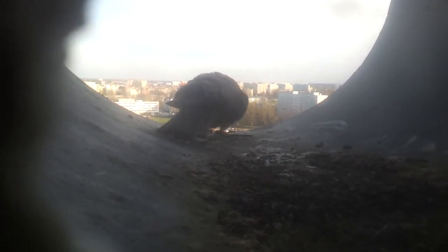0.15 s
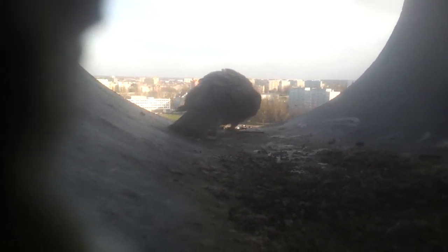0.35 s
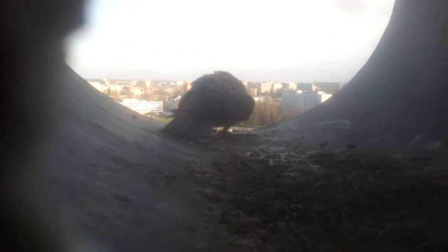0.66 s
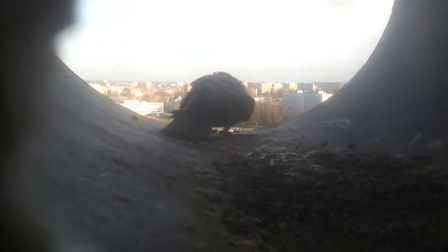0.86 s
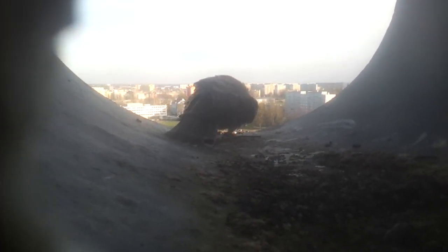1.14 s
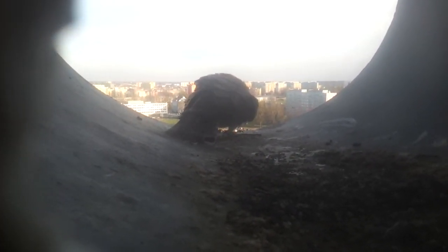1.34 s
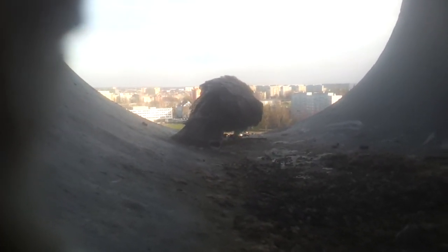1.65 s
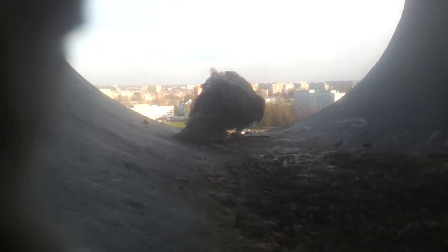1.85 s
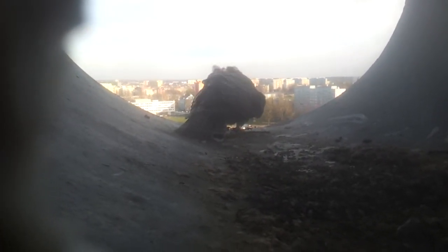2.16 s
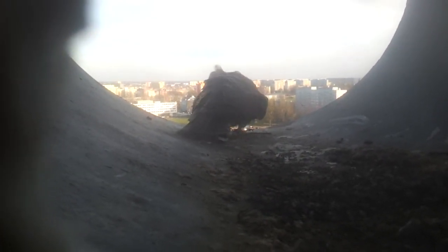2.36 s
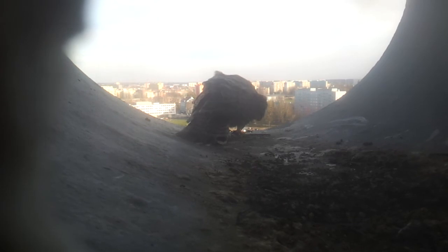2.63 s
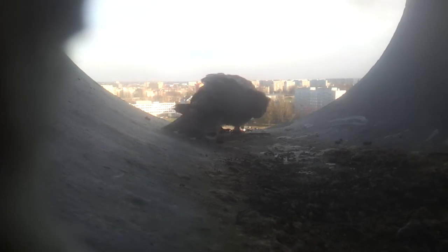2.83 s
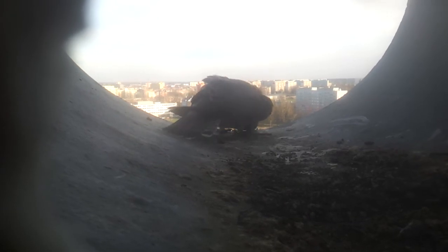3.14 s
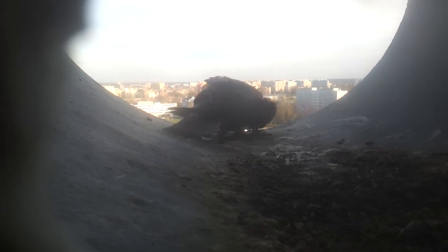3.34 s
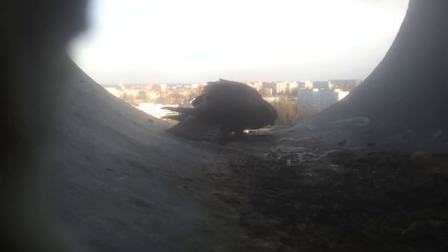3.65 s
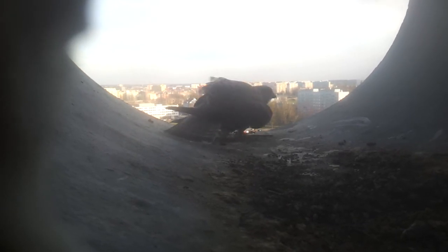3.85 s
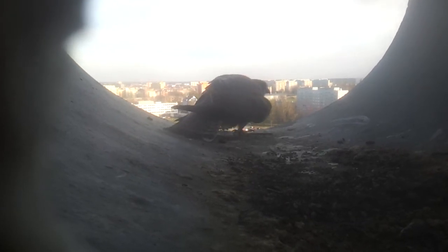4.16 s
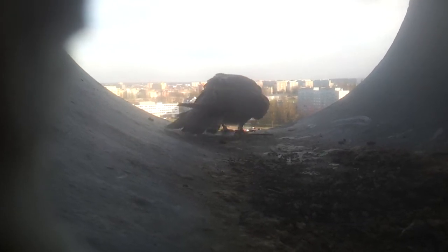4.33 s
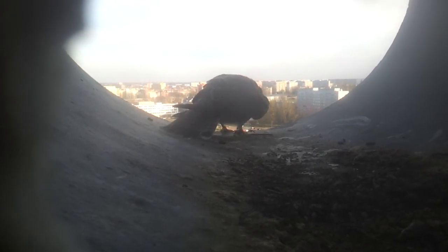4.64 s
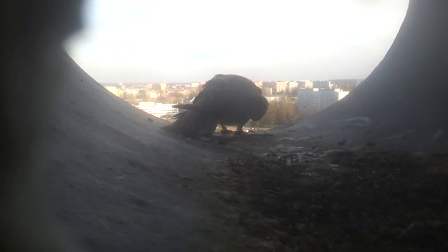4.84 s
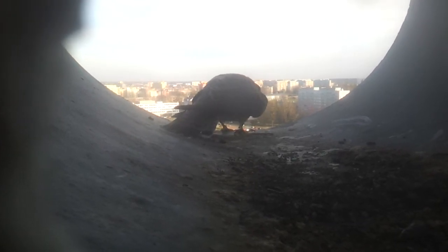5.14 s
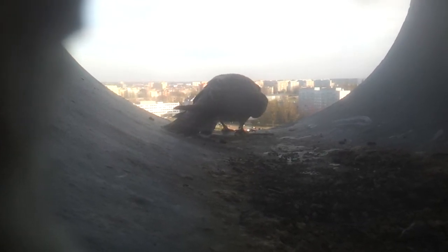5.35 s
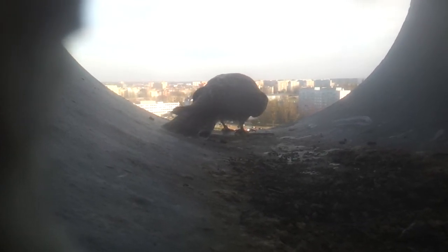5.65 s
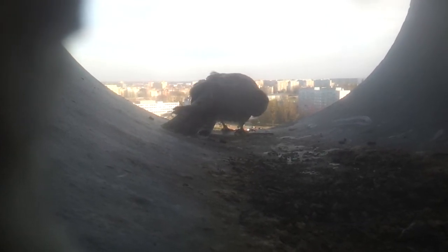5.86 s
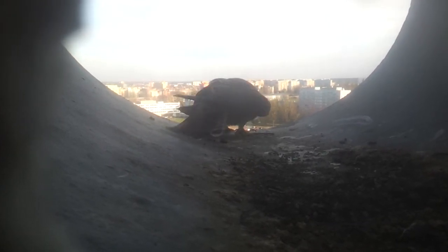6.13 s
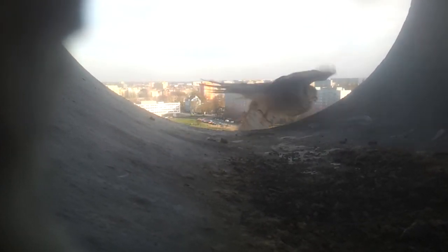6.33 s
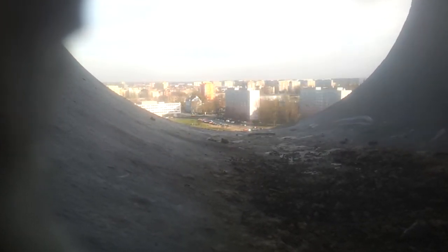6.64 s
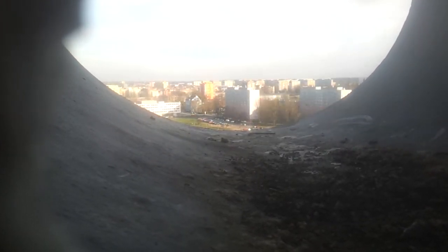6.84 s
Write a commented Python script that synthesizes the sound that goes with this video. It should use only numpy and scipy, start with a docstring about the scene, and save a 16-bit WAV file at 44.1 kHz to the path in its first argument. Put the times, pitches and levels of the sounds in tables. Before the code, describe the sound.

A kestrel gives two runs of shrill trills that ring in a concrete duct, over a steady low rumble of distant traffic.

```python
"""Two runs of shrill kestrel trills ring out at the mouth of a concrete duct, high above a town.
Each trill is a string of arched syllables, about 18 a second, one push of air apiece; pitch and level
climb with effort. The first run cracks into a thin falling whistle. The duct rings after the calls
and booms with distant traffic, and a bird's claws tick twice on the concrete."""
import sys
import numpy as np
from scipy import signal
from scipy.fft import rfft, irfft, next_fast_len
from scipy.io import wavfile
from scipy.ndimage import map_coordinates

SR = 44100
rng = np.random.default_rng(int(sys.argv[2]) if len(sys.argv) > 2 else 0)


def store_pcm(level_fs):
    """Save levels as 16-bit WAV."""
    pcm = np.round(np.clip(level_fs, -1, 1) * 32767).astype(np.int16)
    wavfile.write(sys.argv[1], SR, np.atleast_2d(pcm).T)


N = 308259

# Fader ride of the traffic. Each row: time in seconds, rumble level in dB, tyre roar level in dB.
TRAFFIC_RIDE = [(0, -37.5, -47), (0.8, -36.5, -46.5), (2, -37.5, -46), (3.2, -40.5, -47), (4.2, -39, -47.5),
                (5, -38, -48), (6, -37.5, -49), (6.99, -37.5, -49.5)]
# EQ curves of the three noise beds. Each row: frequency in Hz, gain in dB.
RUMBLE_EQ = [(15, -34), (26, -19), (42, -12), (62, -4.5), (80, -10), (100, -4), (125, -10.5), (165, -12.5),
             (205, -11), (260, -20), (400, -31.5), (900, -92)]
TYRE_EQ = [(120, -22), (290, 3.5), (420, 0), (520, -0.5), (720, -0.5), (950, 4), (1250, 0), (1700, -5),
           (2300, -10.5), (3500, -18.5), (7000, -32.5)]
HISS_EQ = [(800, 2.5), (2500, 0.5), (5000, 4.5), (9000, 2.5), (14500, -1.5)]
# The duct's low, booming resonances. Each row: centre in Hz, width in Hz, lift in dB.
BOOM_MODES = [(53.8, 2.6, 14), (77.3, 3.3, 9), (110.2, 3.2, 5.5), (189.8, 7.9, 4), (356.2, 5.7, 10),
              (458.4, 15, 6.5), (594, 7.8, 8.5)]
# Stereo width of the beds. Each row: frequency in Hz, left-right correlation (1 is mono).
BED_CORRELATION = [(30, 0.96), (120, 0.97), (300, 0.87), (600, 0.65), (1200, 0), (2500, 0), (12000, 0)]
# Stereo balance of the beds. Each row: frequency in Hz, left minus right in dB.
BED_PAN = [(30, 9), (80, 4.5), (170, 2.5), (350, 2.5), (700, -0.5), (1400, -1.5), (4000, 0), (12000, 0)]

# Narrow cross resonances that the calls sweep through. Each row: centre in Hz, width in Hz, lift in dB.
DUCT_CROSS_MODES = [(1564, 15, 6.5), (1886, 18, -1.5), (3010, 70, 6)]
# Standing waves pull each pitch to one side.
# Each row: frequency in Hz, left minus right in dB, left phase lead in radians.
STANDING_WAVES = [(1520, -22, 0), (1720, 1, 5.5), (1495, 6, -1.37), (1940, -2.5, 2.48), (3090, -2.5, 6.5),
                  (3255, -0.5, 1), (3388, -9.5, 4), (3463, -3.5, -0.54), (4950, -4.5, 1.25), (4980, -5, 3),
                  (5660, 7.5, -3), (6360, 1, 2.5), (6550, 4, 3), (7300, 2, 0.6), (9350, -16, 1.5)]
# Decay of the duct's ring. Each row: frequency in Hz, seconds to fall by 60 dB.
RING_DECAY = [(1000, 0.63), (3500, 0.63), (5500, 0.53), (7200, 0.45), (12000, 0.16)]
# EQ on the send to that ring. Each row: frequency in Hz, gain in dB.
RING_EQ = [(1600, 1.5), (2400, 0.5), (3100, -6), (3620, 1.5), (3900, 4), (4800, -1.5), (5400, 5),
           (7100, -0.5), (9000, 12)]

# Claws on concrete. Each row: start in seconds, relative level in dB.
CLAW_TICKS = [(0.2278, -27.5), (3.4044, -40)]
# Their bright tone. Each row: frequency in Hz, gain in dB.
CLAW_EQ = [(500, -25), (2000, -10), (4000, 2), (8000, 2), (12000, -14)]

# Throat and open bill, shaping harmonics 3 to 8. Each row: frequency in Hz, gain in dB.
THROAT_EQ = [(4000, 7), (4700, 1), (5100, -0.5), (5500, -2.5), (6000, -7.5), (6500, -3), (7200, -1),
             (8100, -11.5), (9000, -18.5), (10300, -32), (12500, -31), (14500, -73)]
# Single chips, cracks and a yelp. Each row: start in seconds, length in seconds, pitch in Hz, second
# harmonic level in dB, fundamental and upper harmonics in dB against it (before EQ), jitter as a share.
CHIP_CUES = [(0.535, 0.098, 1380, -57, 11.5, -4, 0.01), (0.67, 0.032, 1618, -45, -10, -4, 0.022),
             (0.718, 0.045, 1486, -43, -3, -3, 0.0086), (2.114, 0.027, 1960, -26, -10, -14, 0.014),
             (2.137, 0.0359, 1821, -26.5, -14, -9, 0.015), (2.689, 0.03, 1506, -34, -7, -10.5, 0.029),
             (2.857, 0.033, 1474, -33.5, -21, -16.5, 0.017), (2.872, 0.015, 1820, -41.5, 7.5, -10, 0.016),
             (2.88, 0.025, 1600, -34.5, -8, -9.5, 0.019), (4.262, 0.047, 1436, -45.5, 5.5, -12.5, 0.012),
             (4.312, 0.047, 1484, -39, -3, -10, 0.0091), (6.3, 0.024, 1534, -22.5, -15, -12, 0.0019)]
# Trills. Each row: start, end and syllable period in seconds, first and last pitch in Hz, syllable sag
# as a share of pitch, dip between syllables in dB, final second harmonic level in dB, swell up to it
# in dB, fundamental and upper harmonics in dB against that level (before EQ), jitter as a share.
TRILL_CUES = [(0.787, 0.94, 0.049, 1602, 1646, 0.071, -14.5, -33, 1.9, -5.5, -4, 0.0052),
              (0.949, 1.116, 0.049, 1548, 1737, 0.044, -12, -31.5, 1.5, -10, -7.5, 0.0047),
              (1.313, 1.659, 0.055, 1600, 1785, 0.066, -9.5, -32.5, 13.5, -8, -6.5, 0.006),
              (1.823, 2.119, 0.058, 1714, 1829, 0.064, -14.5, -27.5, 13.4, -12, -8.5, 0.01),
              (2.442, 2.674, 0.06, 1671, 1730, 0.036, -15, -26.5, 12.4, -12.5, -12, 0.0067),
              (4.376, 4.755, 0.0545, 1592, 1794, 0.0302, -10.5, -23, 10.6, -9, -5, 0.0035),
              (4.929, 5.276, 0.056, 1707, 1824, 0.092, -15, -23, 11.1, -12, -7, 0.0049),
              (5.434, 5.720, 0.054, 1716, 1765, 0.04, -13.5, -24.5, 4.3, -13, -10, 0.0033),
              (6.146, 6.299, 0.0525, 1519, 1597, 0.043, -12.5, -34.5, 14.3, -5.5, -4, 0.0047),
              (6.324, 6.513, 0.07, 1591, 1629, 0.014, -4.5, -29.5, 0.37, -10, -9, 0.0029),
              (6.697, 6.985, 0.052, 1618, 1727, 0.039, -10, -43.5, 7.1, -8.5, -5.5, 0.0044)]


def amp(db):
    """Decibels to gain."""
    return 10 ** (np.asarray(db) / 20)


def unit(x):
    """Scale to rms 1."""
    return x / np.sqrt(np.mean(x ** 2) + 1e-20)


def along(points, hz):
    """Read a curve of (Hz, value) points on a log frequency axis."""
    freqs, values = np.transpose(points)
    return np.interp(np.log(hz + 1), np.log(freqs + 1), values)


def lift(resonances, hz):
    """Gain in dB of a set of resonant peaks."""
    return sum(db / (1 + (2 * (hz - centre) / width) ** 2) for centre, width, db in resonances)


def wobble(rate):
    """Smooth random modulation with `rate` knots a second."""
    knots = rng.standard_normal(N // 4)
    at = np.arange(N) * rate / SR
    return map_coordinates(knots[:int(at[-1]) + 4], [at])


def filtered(x, response):
    """Filter x by a complex gain given as a function of Hz."""
    size = next_fast_len(N + SR // 2)
    return irfft(rfft(x, size) * response(np.fft.rfftfreq(size, 1 / SR)), size)[..., :N]


def pan(db):
    """Constant-power stereo gains for a left-minus-right level."""
    pair = np.array([amp(db / 2), amp(-db / 2)])
    return pair / np.sqrt(np.mean(pair ** 2, axis=0))


def noise_bed(eq):
    """Noise booming in the duct: nearly mono in the lows, wide in the highs, mid signal at rms 1."""
    def colour(hz):
        width = np.arccos(np.clip(along(BED_CORRELATION, hz), -1, 1)) / 2
        return amp(along(eq, hz) + lift(BOOM_MODES, hz)) * [np.cos(width), np.sin(width)]
    mid, side = filtered(rng.standard_normal((2, N)), colour)
    pair = filtered(np.array([mid + side, mid - side]), lambda hz: pan(along(BED_PAN, hz)))
    return pair / np.std(pair.mean(axis=0))


def town(drone_hz=33, drone_db=-50, hiss_db=-58):
    """Distant traffic rumbles and its tyres roar, over a deep steady drone and a faint hiss."""
    t = np.arange(N) / SR
    times, rumble_db, tyre_db = np.transpose(TRAFFIC_RIDE)
    drone = unit(np.sin(2 * np.pi * drone_hz * t + 0.078 * wobble(1.85))) * pan(2.6)[:, None]
    rumble = amp(np.interp(t, times, rumble_db)) * noise_bed(RUMBLE_EQ)
    tyres = amp(np.interp(t, times, tyre_db)) * noise_bed(TYRE_EQ)
    return rumble + tyres + amp(drone_db) * drone + amp(hiss_db) * noise_bed(HISS_EQ)


def reverb(x, t60_points):
    """Diffuse stereo reflections: a noise tail whose decay time is set by frequency."""
    hz, t, spectrum = signal.stft(rng.standard_normal((2, SR)), SR, nperseg=256)
    decay = amp(-60 * t / along(t60_points, hz)[:, None])
    tail = signal.istft(spectrum * decay, SR, nperseg=256)[1]
    return signal.fftconvolve(x[None], tail / np.linalg.norm(tail[0]), axes=1)[:, :N]


def duct(x, left_lag_s=0.00033, direct_db=-3.5, walls_db=-6, walls_t60=0.1, ring_db=-12):
    """The duct colours a sound, which arrives on the right first; close walls and a long ring follow."""
    mode_hz, pan_db, lead = np.transpose(STANDING_WAVES)

    def phase_split(hz):
        angle = np.interp(hz, mode_hz, lead) - 2 * np.pi * hz * left_lag_s
        return np.exp(.5j * angle * np.array([[1], [-1]]))
    coloured = filtered(x, lambda hz: amp(lift(DUCT_CROSS_MODES, hz)))
    direct = amp(direct_db) * filtered(coloured, phase_split)
    walls = amp(walls_db) * reverb(coloured, [(1000, walls_t60)])
    near = filtered(direct + walls, lambda hz: pan(np.interp(hz, mode_hz, pan_db)))
    ring_send = filtered(coloured, lambda hz: amp(ring_db + along(RING_EQ, hz)))
    return near + reverb(ring_send, RING_DECAY)


def claws(t60=0.011, trim_db=-3):
    """Claws strike concrete: tiny, bright bursts of noise."""
    ticks, t = np.zeros(N), np.arange(SR // 20) / SR
    for start, db in CLAW_TICKS:
        envelope = amp(db + trim_db - 60 * t / t60)
        ticks[round(start * SR):][:len(t)] += envelope * rng.standard_normal(len(t))
    return filtered(ticks, lambda hz: amp(along(CLAW_EQ, hz)))


def whistle(start_s=2.7, length_s=0.16, ramp_s=0.0039, first_hz=2424, last_hz=2134, jitter=0.021,
            level_db=-39, fade_db=13.5, octave_db=-17):
    """The voice cracks into a thin, unsteady tone that slides down and fades."""
    t = np.arange(N) / SR - start_s
    progress = np.clip(t / length_s, 0, 1)
    hz = first_hz + (last_hz - first_hz) * progress
    phase = 2 * np.pi * np.cumsum(hz * (1 + jitter * wobble(500))) / SR
    tone = np.sqrt(2) * (np.sin(phase) + amp(octave_db) * np.sin(2 * phase))
    gate = np.clip(np.minimum(t, length_s - t) / ramp_s, 0, 1)
    return gate * amp(level_db - fade_db * progress) * tone


def syllables(chip_sag=0.024, chip_dip_db=-8.5, early_s=0.011, pitch_ease=1.636, level_ease=2.3):
    """All syllables in time order. Growing effort lifts and steadies a trill, fast at first."""
    rows = [(start, length, hz, chip_sag, chip_dip_db, db, db + root_db, db + upper_db, jitter)
            for start, length, hz, db, root_db, upper_db, jitter in CHIP_CUES]
    for (start, end, period, first_hz, last_hz, sag, dip_db,
         final_db, swell_db, root_db, upper_db, jitter) in TRILL_CUES:
        count = round((end - start) / period)
        edges = np.r_[start - early_s, start + period * np.arange(1, count), end]
        # slack runs from 1, the softest push, to 0 at full effort
        for onset, length, slack in zip(edges, np.diff(edges), np.linspace(1, 0, count)):
            hz = last_hz - (last_hz - first_hz) * slack ** pitch_ease
            fall = sag * np.exp(0.29 * rng.standard_normal())
            db = final_db + 0.77 * rng.standard_normal()
            held_db = swell_db * slack ** level_ease
            # the second harmonic takes the whole swell, the fundamental and the upper ones a share
            levels = db - held_db, db + root_db - 0.38 * held_db, db + upper_db - 0.87 * held_db
            gap_db = dip_db * (1 - 0.19 * (1 - slack))  # effort partly fills the dips
            rows.append((onset, length, hz, fall, gap_db, *levels, jitter * (1 + 1.39 * slack)))
    return sorted(rows)


def kestrel(attack_s=0.0089, overlap_s=0.007, rasp=0.68, fuzz=0.058,
            hold=0.514, bottom=0.935, glide=0.235, opening_glide=0.374,  # shares of a syllable
            overshoot=0.019, opening_drop=0.1687, closing_drop=0.052,  # shares of its pitch
            flutter_db=1.7, dull_db=-6, closing_db=-9):
    """Trills and chips: each push of air lifts pitch and level together; both sag as it runs out."""
    body, edge = np.zeros((2, N + SR))
    tremor = wobble(260) + rasp * wobble(1300)
    notes = syllables()
    starts, lengths, pitches, falls = np.transpose(notes)[:4]
    paused = starts[1:] - starts[:-1] - lengths[:-1] > .05
    opens, closes = np.r_[True, paused], np.r_[paused, True]
    harmonics = np.arange(3, 9)[:, None]
    # turbulence frays each upper harmonic separately
    fray = 1 + fuzz * np.array([wobble(520) + 1j * wobble(570) for _ in harmonics])
    # after a pause the voice scoops up from below; otherwise it picks up from the last sag
    from_hz = np.where(opens, pitches * (1 - opening_drop), np.roll(pitches * (1 - falls), 1))
    for i, (start, length, pitch_hz, fall, dip_db, second_db, root_db, upper_db,
            jitter) in enumerate(notes):
        t = np.arange(int((length + overlap_s) * SR)) / SR
        span = round((start - overlap_s / 2) * SR) + np.arange(len(t))
        scoop = np.clip(1 - t / length / (opening_glide if opens[i] else glide), 0, 1) ** 2
        spent = np.clip((t / length - hold) / (1 - hold), 0, 1)
        sag = np.sin(np.pi / 2 * np.minimum(spent / (1 if closes[i] else bottom), 1)) ** 2
        dive = closes[i] * spent ** 2
        crest = overshoot * np.clip(1 - t / (hold * length), 0, 1)
        arch = 1 + crest - fall * sag - closing_drop * dive
        hz = scoop * from_hz[i] + (1 - scoop) * pitch_hz * arch
        # the membranes run less evenly as the pressure drops
        uneven = jitter * tremor.take(span, mode="clip") * (1 + sag + 2 * dive)
        phase = 2 * np.pi * np.cumsum(hz * (1 + uneven)) / SR
        gate = np.clip(t / attack_s, 0, 1) * np.clip((t[-1] - t) / overlap_s, 0, 1)
        push = np.sqrt(2) * gate * amp(dip_db * (sag + opens[i] * scoop))
        body[span] += push * (amp(root_db) * np.sin(phase) + amp(second_db) * np.sin(2 * phase))
        # the upper harmonics bloom as the pitch arrives and die first in the closing dive
        upper = np.sum(fray.take(span, axis=1, mode="clip") * np.exp(1j * harmonics * phase), axis=0)
        edge[span] += push * amp(upper_db + dull_db * scoop + closing_db * dive) * upper.imag
    voice = body[:N] + filtered(edge[:N], lambda hz: amp(along(THROAT_EQ, hz)))
    return voice * amp(flutter_db * wobble(180))


def scene():
    """Calls and claws sound through the duct, over the bed of the town."""
    return duct(kestrel() + whistle() + claws()) + town()


def record(dry, cutoff_hz=14650):
    """A brick-wall low-pass takes the very top off the mix."""
    return filtered(dry, lambda hz: hz < cutoff_hz)


dry = scene()
out = record(dry)
store_pcm(out)
```